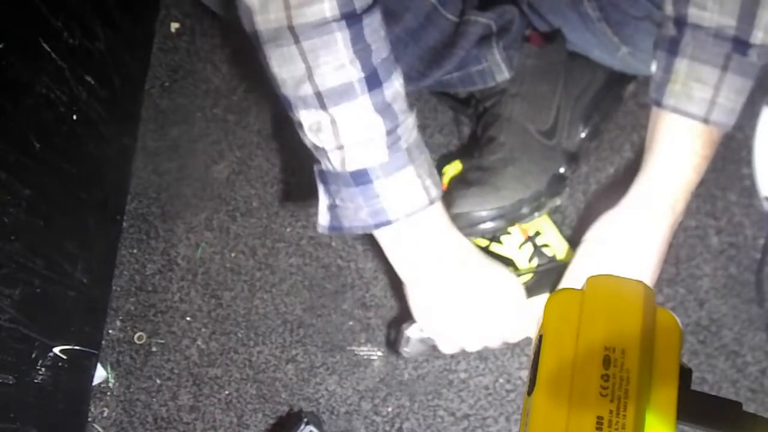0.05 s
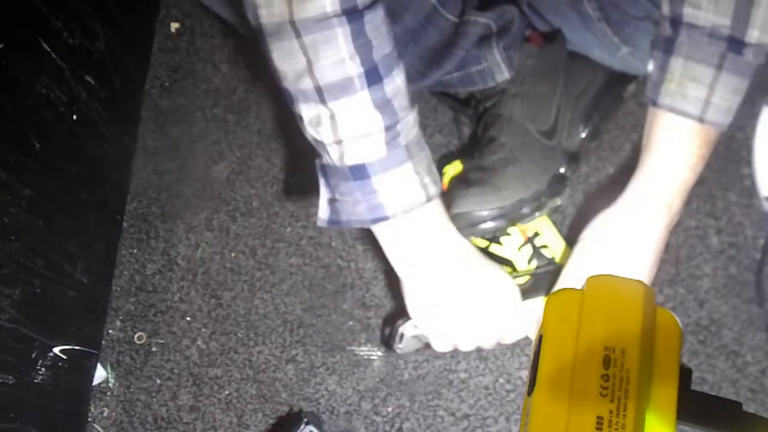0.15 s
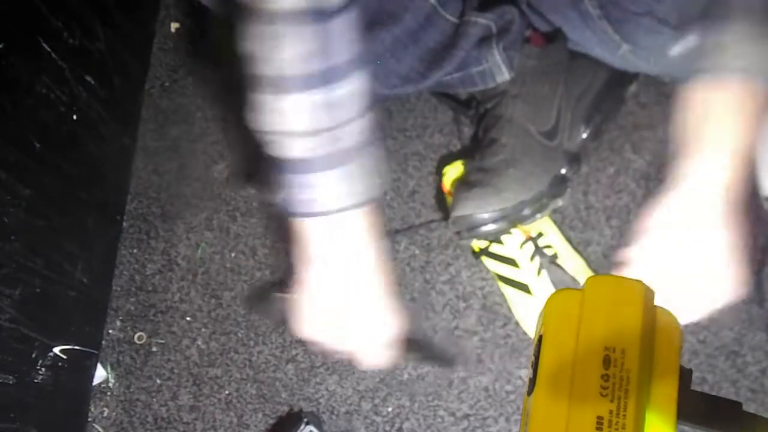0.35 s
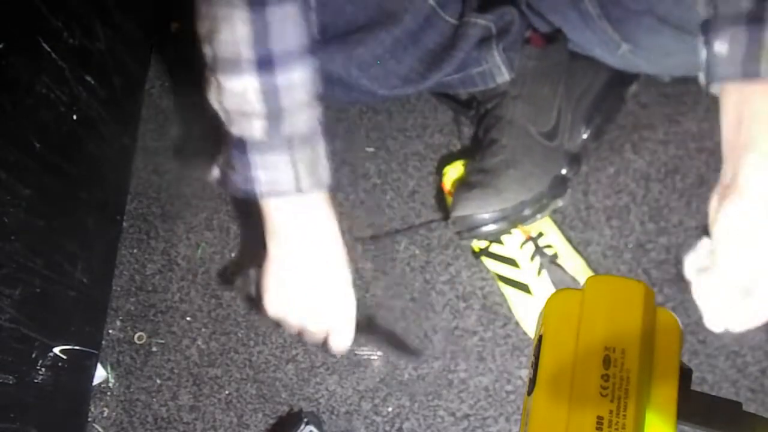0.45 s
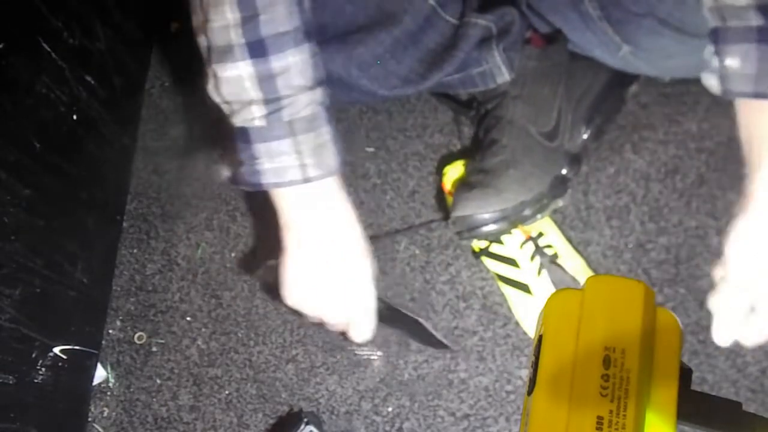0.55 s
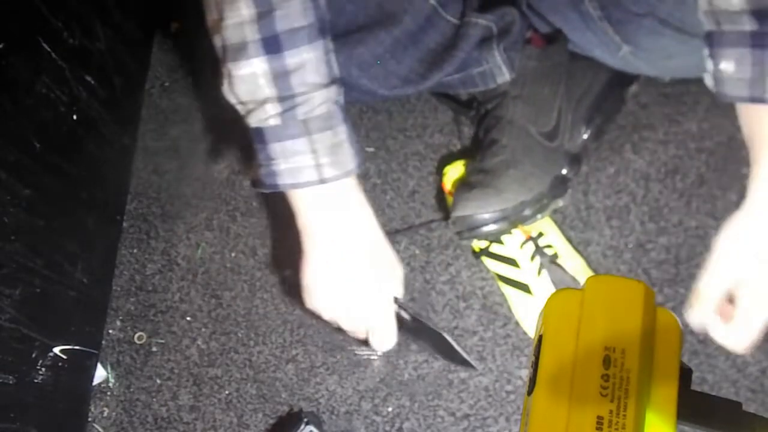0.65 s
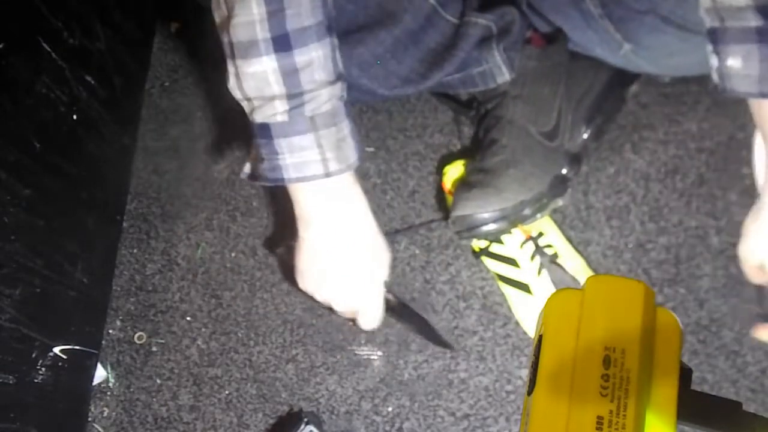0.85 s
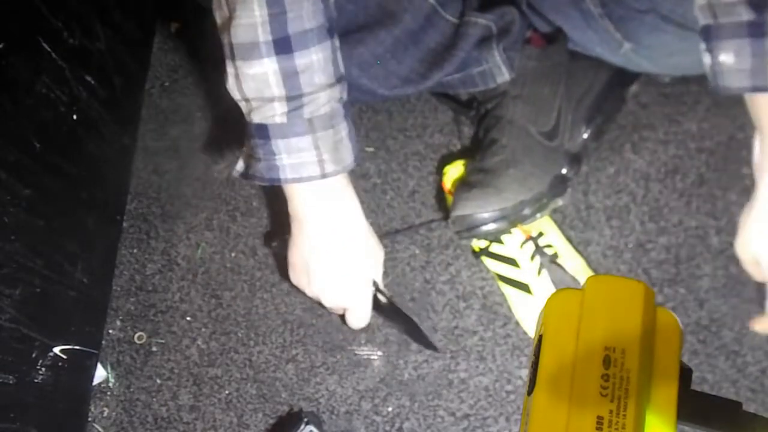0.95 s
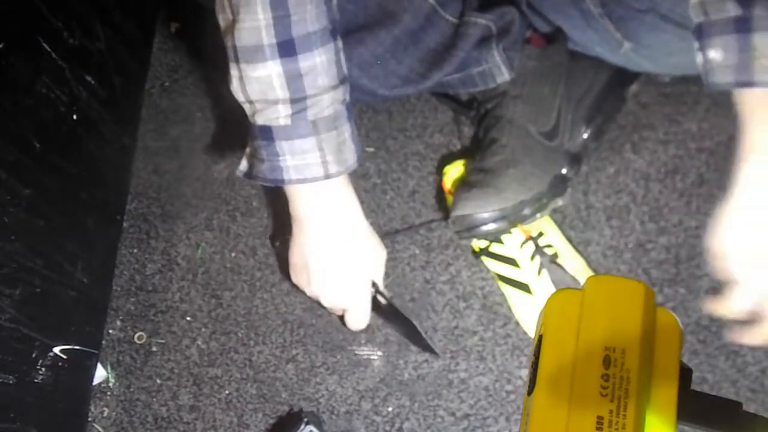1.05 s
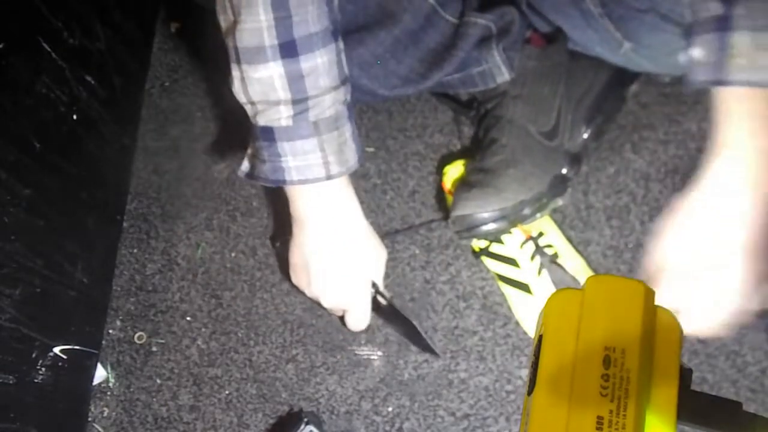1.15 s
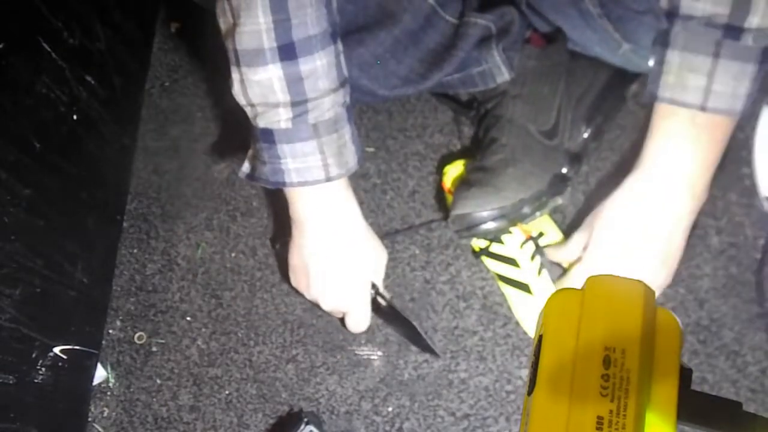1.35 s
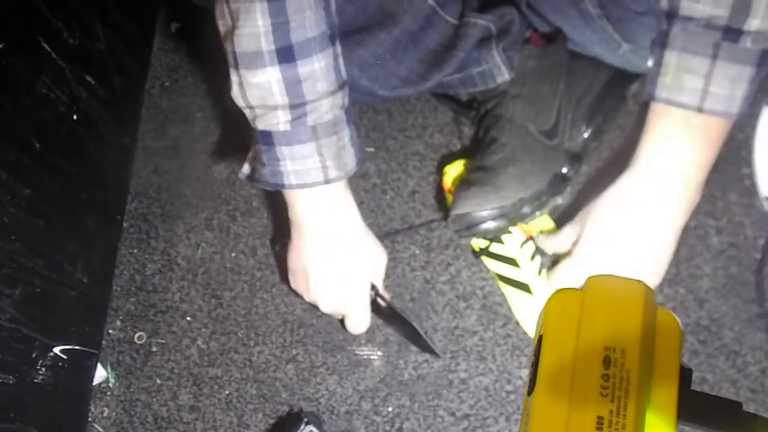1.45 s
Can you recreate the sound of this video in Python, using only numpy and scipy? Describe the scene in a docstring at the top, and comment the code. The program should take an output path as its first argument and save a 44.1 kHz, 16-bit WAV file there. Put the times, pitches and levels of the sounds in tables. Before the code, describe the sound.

A knife cuts through a tough part of a shoe in a quiet, dead room. The blade catches with a dull click at about 0.2 seconds, rasps briefly and breaks through with a sharp double snap at 0.3. A soft thump and small flaps die away by 0.5 seconds. Very faint sleeve brushes follow between 0.6 and 1.5 seconds, over a low, steady hiss.

```python
"""A knife is pulled through a tough part of a shoe on a carpeted floor in a quiet, dead room. The blade catches
with a dull click, rasps as fibres part under growing load and breaks through with a double snap; these forces
excite the damped modes of the shoe and the high modes of the blade. The freed piece thumps and flaps, the blade
slides out, and a sleeve brushes faintly over steady hiss."""
import sys
import numpy as np
from scipy import signal
from scipy.fft import rfft, irfft
from scipy.io import wavfile

SR = 44100
rng = np.random.default_rng(int(sys.argv[2]) if len(sys.argv) > 2 else 0)


def generate_wav(signal):
    """Clip the signal to [-1, 1] and save it as 16-bit WAV at the path in sys.argv[1]."""
    frames = np.transpose(np.atleast_2d(signal))
    scaled = np.clip(frames, -1, 1) * 32767
    pcm = np.round(scaled).astype(np.int16)
    wavfile.write(sys.argv[1], SR, pcm)


N = 66150
T = np.arange(N) / SR
HZ = np.maximum(np.arange(N + 1) * SR / (2 * N), 1)
CUTOFF_HZ = 15800


def from_db(db):
    """Amplitude grows tenfold for every 20 decibels."""
    return 10 ** (np.asarray(db) / 20)


def unit_rms(x):
    """Division by the root mean square gives unit power."""
    return x / np.sqrt(np.mean(x ** 2) + 1e-20)


def gains(points):
    """A gain curve joins (frequency_hz, level_db) points by straight lines on logarithmic axes."""
    hz, db = np.transpose(points)
    return from_db(np.interp(np.log(HZ), np.log(hz), db))


def filtered(x, response):
    """Linear filtering multiplies the spectrum by a frequency response."""
    return irfft(rfft(x, 2 * N) * response)[:N]


def minimum_phase(gain):
    """Causality: folding the cepstrum gives a response with these gains that sounds nothing early."""
    cepstrum = irfft(np.log(gain))
    return np.exp(rfft(np.r_[cepstrum[0], 2 * cepstrum[1:N]], 2 * N))


def impulse(at_s):
    """A unit impulse, shared between the nearest samples, has a broad spectrum."""
    return np.maximum(1 - np.abs(T - at_s) * SR, 0)


def decay(start_s, t60_s):
    """Exponential damping: the envelope starts at once and falls 60 dB in t60_s."""
    return (T >= start_s) * from_db(-60 * np.clip((T - start_s) / t60_s, 0, 5))


def hiss(level_db=-60.5):
    """Stationary noise: room air and hiss keep a constant spectrum, strongest in the lows."""
    # frequency_hz, relative_density_db
    spectrum = [(15, -25), (25, -21), (43, -10.5), (71, -7), (152, -0.5), (260, -2.5), (378, -0.5),
                (482, -7), (598, -2.5), (666, -8), (1200, -10.5), (1340, -13), (5730, -19.5),
                (13900, -21.5), (15500, -23.5)]
    noise = filtered(rng.standard_normal(N), gains(spectrum) * (HZ < CUTOFF_HZ))
    return from_db(level_db) * unit_rms(noise)


def blade_catch(start_s=0.2296, click_db=-16, grit_db=-38.5):
    """Dispersion: the lows travel slower, spreading a dull, gritty click into a quick downward chirp."""
    # frequency_hz, gain_db
    colour = [(50, -30), (120, -8), (200, 12), (300, 14), (410, 19.5), (560, 2.5), (1000, 5), (1700, 5),
              (2900, -0.5), (4500, -17.5), (8000, -34), (15000, -36)]
    low_delay_s, delay_fade_hz = 0.00463, 2170
    group_delay_s = low_delay_s * np.exp(-HZ / delay_fade_hz)
    dispersion = np.exp(-2j * np.pi * np.cumsum(group_delay_s) * SR / (2 * N))
    click = from_db(click_db) * impulse(start_s)
    grit = from_db(grit_db) * rng.standard_normal(N) * decay(start_s, t60_s=0.055)
    return filtered(click + grit, gains(colour) * dispersion)


def room_reverb(sound, level_db=-13):
    """Diffuse reflection: close walls return a tail that absorption by the carpet keeps short."""
    tail = rng.standard_normal(N) * decay(start_s=0.0076, t60_s=0.16)
    tail /= np.sqrt(np.sum(tail ** 2))
    return from_db(level_db) * signal.fftconvolve(sound, tail)[:N]


def slicing(fibres_per_s=3200, spread_db=0.5, rasp_db=-12, body_db=-2.5):
    """Shot noise: fibres part as dense tiny clicks that rasp and shake the shoe."""
    # drag of the edge through the material: time_s, level_db
    drag = [(0.245, -69), (0.279, -50.5), (0.303, -47.5), (0.318, -36), (0.321, -40), (0.34, -40.5),
            (0.364, -51.5), (0.402, -45.5), (0.427, -58.5), (0.479, -62)]
    # spectrum of parting fibres: frequency_hz, relative_density_db
    spectrum = [(80, -22), (600, -24.5), (900, 2.5), (1700, 19.5), (2500, -5), (3900, 9.5), (4900, -5.5),
                (7400, 8.5), (8800, -1), (12000, 10.5), (15000, -6), (15800, -15)]
    times_s, levels_db = np.transpose(drag)
    drag_db = np.interp(T, times_s, levels_db, left=-120, right=-120)
    peak_db = levels_db.max()
    sizes = from_db(spread_db * np.minimum(rng.exponential(1, N), 4))
    signs = rng.choice([-1, 1], N)
    fibres = sizes * signs * (rng.random(N) < fibres_per_s / SR)
    rasp = unit_rms(filtered(fibres, minimum_phase(gains(spectrum))))
    rasp_growth = 1.23   # the rasp grows faster than the body, so harder drag is brighter
    rasp_envelope = from_db(rasp_db + peak_db + rasp_growth * (drag_db - peak_db))
    return rasp_envelope * rasp + from_db(drag_db + body_db) * unit_rms(shoe_resonance(fibres))


def shoe_resonance(force, low_cut_hz=167):
    """Modal superposition: a force rings damped modes, the lower ones of a shoe too small to radiate deep bass,
    the highest of the blade."""
    # pitch_hz, gain_db, t60_s
    modes = [(275, -10, 0.13), (340.3, 2, 0.046), (401, -8.5, 0.031), (772, 1, 0.012), (912, -7, 0.011),
             (1490, -11.5, 0.031), (1567, -13.5, 0.054), (2060, -29, 0.034), (2734, -15, 0.023),
             (3340, -20.5, 0.0042), (3750, -28, .014), (7150, -24, 0.012), (11750, -13, .016),
             (13100, -11, 0.0089)]
    ringing = 0
    for pitch_hz, gain_db, t60_s in modes:
        radius = from_db(-60 / (t60_s * SR))
        angle = 2 * np.pi * pitch_hz / SR
        feedback = [1, -2 * radius * np.cos(angle), radius * radius]
        ringing += from_db(gain_db) * signal.lfilter([0.5, 0, -0.5], feedback, force + 1e-18)
    return signal.sosfilt(signal.butter(2, low_cut_hz, "high", fs=SR, output="sos"), ringing)


def snaps(crack_t60_s=0.0057):
    """Fracture: each break releases stress, kicking the shoe and giving a few milliseconds of crackle."""
    # start_s, body_db, crack_db
    breaks = [(0.3172, -32.5, -38), (0.3253, -49.5, -30.5), (0.3282, -33.5, -26.5), (0.3298, -42.5, -21.5),
              (0.3312, -41.5, -33.5), (0.4025, -53, -56)]
    # spectrum of a crack: frequency_hz, relative_density_db
    spectrum = [(80, -43), (600, 10), (1000, 15.5), (2000, 0.5), (3900, 10), (4900, -20), (7400, 0.5),
                (8700, -9), (11000, -3.5), (15000, -0.5), (15800, -20)]
    force = sum(from_db(body_db) * impulse(start_s) for start_s, body_db, _ in breaks)
    envelope = sum(from_db(crack_db) * decay(start_s, crack_t60_s) for start_s, _, crack_db in breaks)
    crackle = filtered(rng.standard_normal(N) * envelope, minimum_phase(unit_rms(gains(spectrum))))
    return shoe_resonance(force) + crackle


def knocks():
    """Contact time limits bandwidth: soft pushes drive mainly the low modes; the first two carry the low end of
    the snaps a little after each break, the rest are knocks of shoe and freed piece."""
    # peak_s, impulse_db, half_contact_s
    contacts = [(0.3205, -25, 0.00098), (0.33, -30, 0.00031), (0.3776, -37.5, 0.00068),
                (0.4129, -38, 0.00068), (0.450, -47.5, 0.00055), (0.527, -52, .0006)]
    force = 0
    for peak_s, impulse_db, half_contact_s in contacts:
        push = np.exp(-((T - peak_s) / half_contact_s) ** 2)
        force += from_db(impulse_db) * push / push.sum()
    return shoe_resonance(force)


def floor_thump(start_s=0.3345, level_db=-47, pitch_hz=138.5, rise_s=0.0071, ring_db=1):
    """Damped oscillation: the settling sole gives a low push to the floor, which rings on weakly."""
    age_s = np.maximum(T - start_s, 0)
    rise = (age_s / rise_s) ** 2
    push = rise * np.exp(1 - rise)
    ring = from_db(ring_db) * (1 - np.exp(-rise)) * decay(start_s, t60_s=0.22)
    return -from_db(level_db) * np.sin(2 * np.pi * pitch_hz * age_s) * (push + ring)


def brushes():
    """Sliding friction: sleeve and hand make faint swells of band-limited noise."""
    # peak_s, half_length_s, level_db, centre_hz, width_octaves
    strokes = [(0.635, .016, -63, 12900, 0.61), (0.873, 0.013, -59, 780, 0.38),
               (1.11, 0.032, -62.5, 160, 0.28), (1.465, 0.042, -61, 347, 0.57)]
    sound = 0
    for peak_s, half_length_s, level_db, centre_hz, width_octaves in strokes:
        band = np.exp(-(np.log2(HZ / centre_hz) / width_octaves) ** 2 / 2)
        friction = unit_rms(filtered(rng.standard_normal(N), band))
        swell = np.exp(-((T - peak_s) / half_length_s) ** 2)
        sound += from_db(level_db) * friction * swell
    return sound


def scene():
    """Superposition: steady hiss, the cut, its reverberation and the brushes add in one channel."""
    background = hiss()
    cut = blade_catch() + snaps() + knocks() + floor_thump() + slicing()
    return (background + cut + room_reverb(cut) + brushes())[None]


def record(dry):
    """Band limiting: a steep low-pass filter removes the highest treble."""
    low_pass = 1 / np.sqrt(1 + (HZ / CUTOFF_HZ) ** 300)
    return filtered(dry[0], low_pass)[None]


dry = scene()
out = record(dry)
generate_wav(out)
```